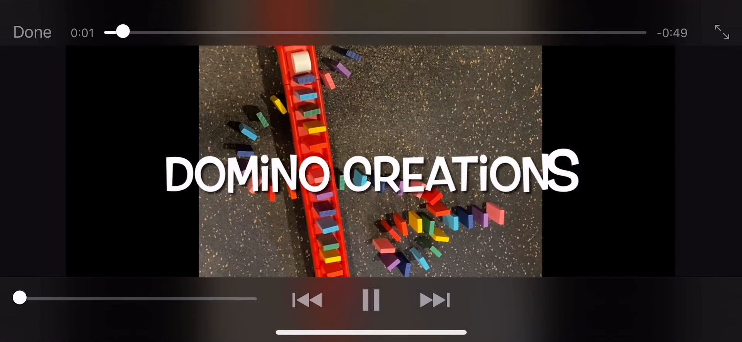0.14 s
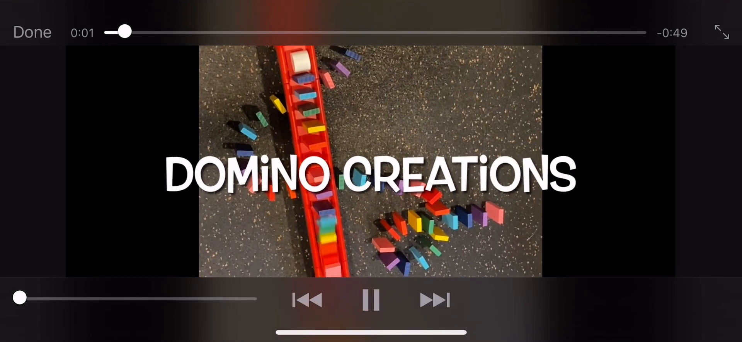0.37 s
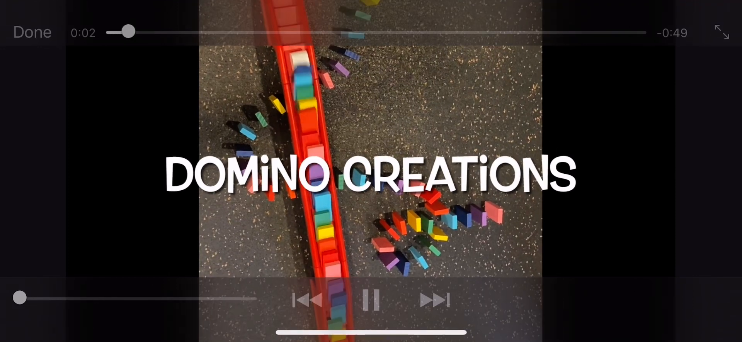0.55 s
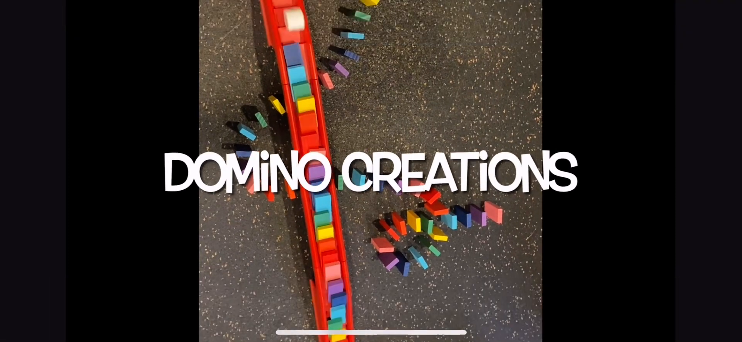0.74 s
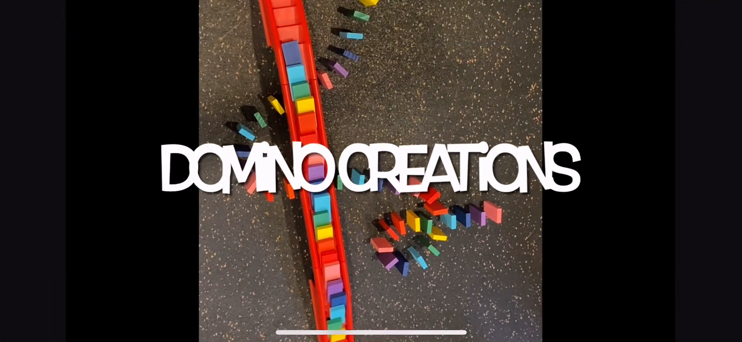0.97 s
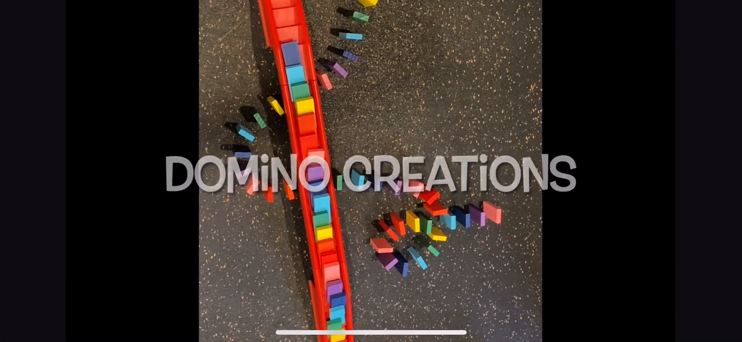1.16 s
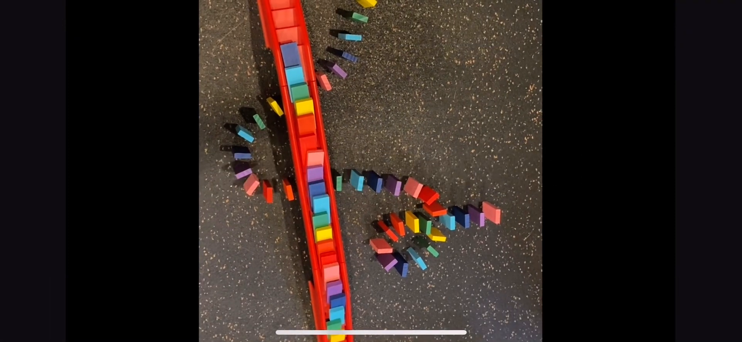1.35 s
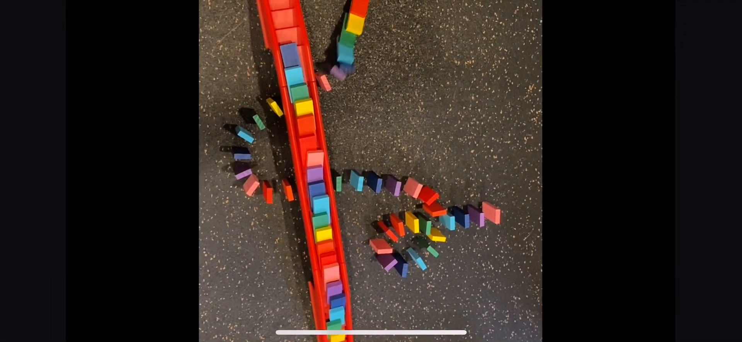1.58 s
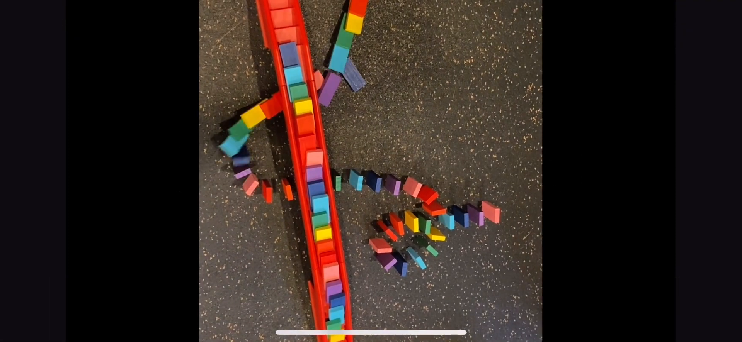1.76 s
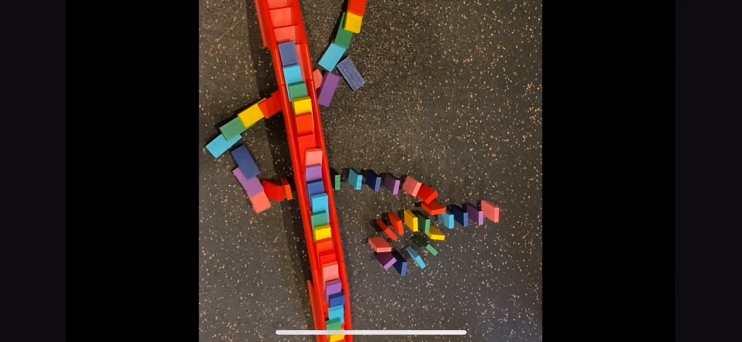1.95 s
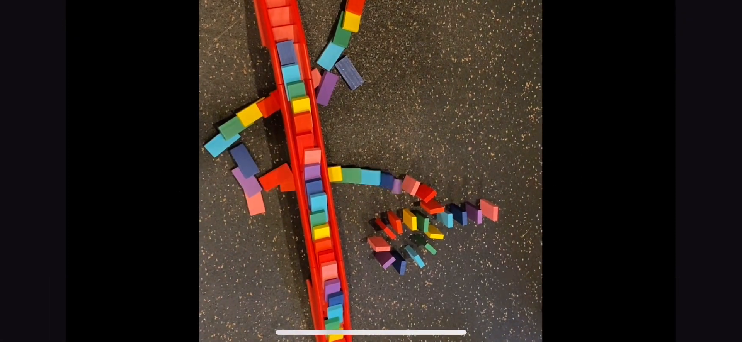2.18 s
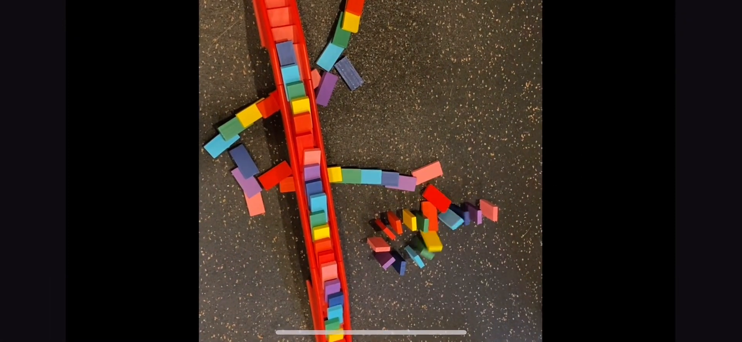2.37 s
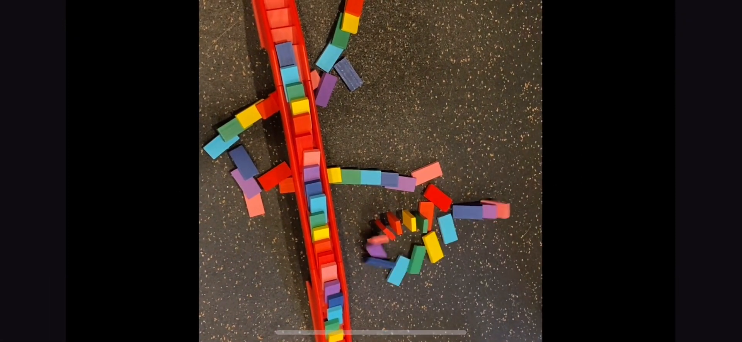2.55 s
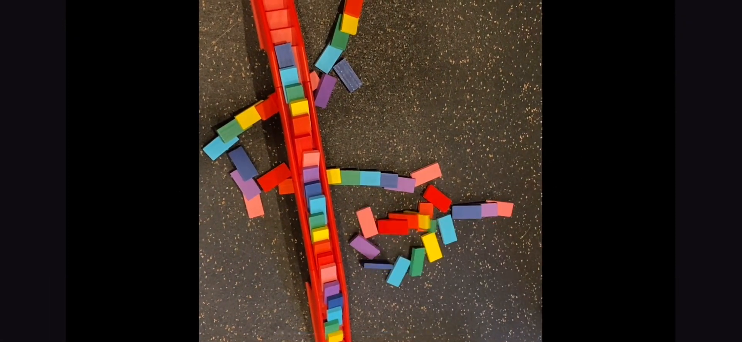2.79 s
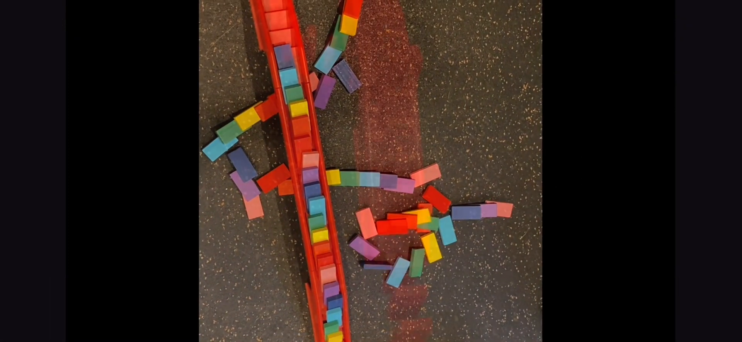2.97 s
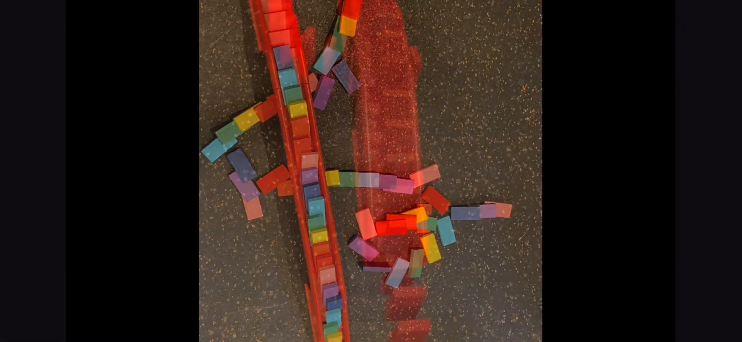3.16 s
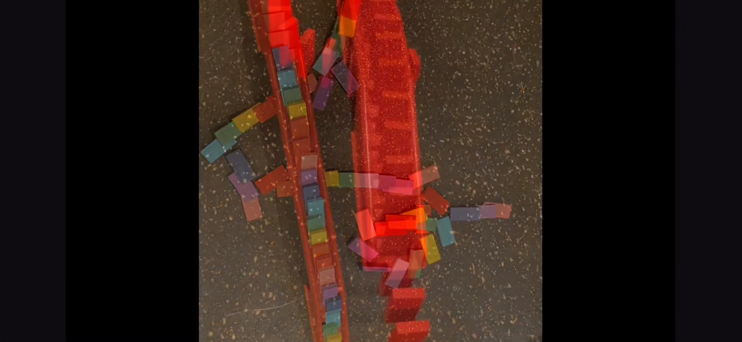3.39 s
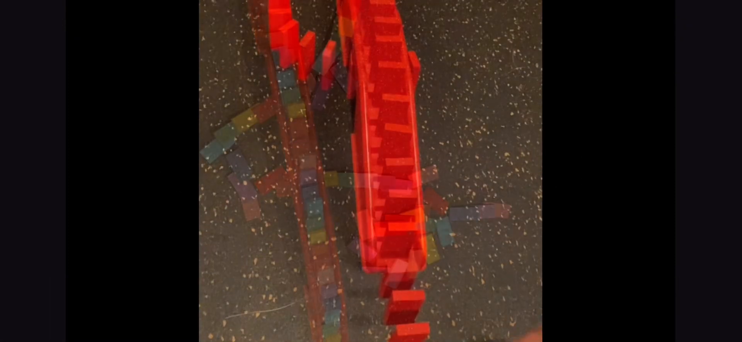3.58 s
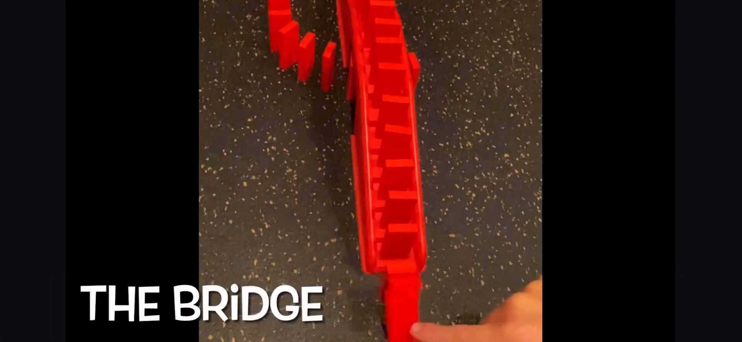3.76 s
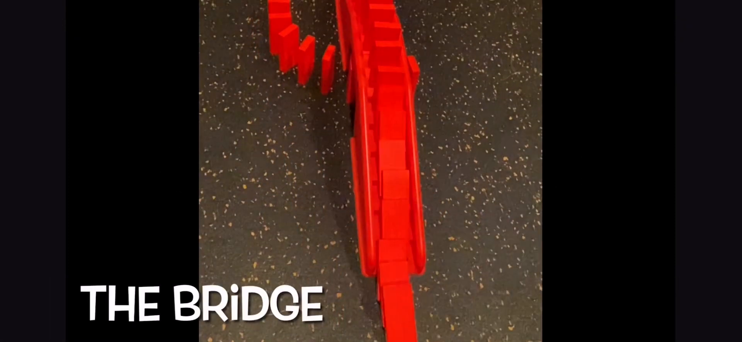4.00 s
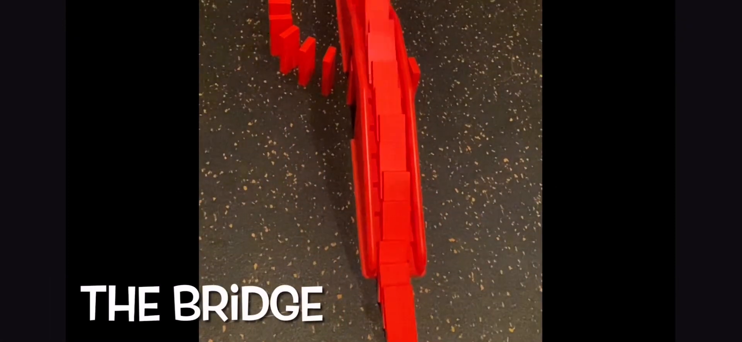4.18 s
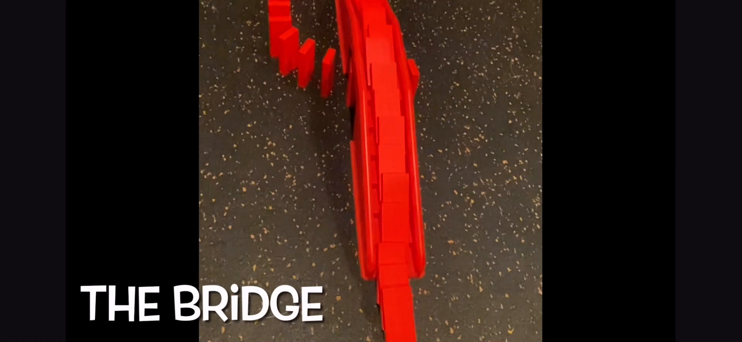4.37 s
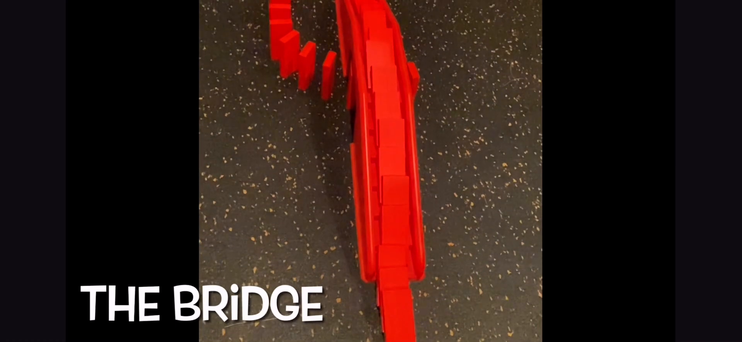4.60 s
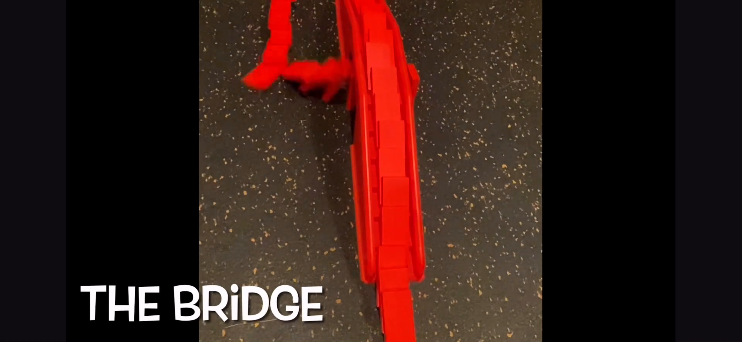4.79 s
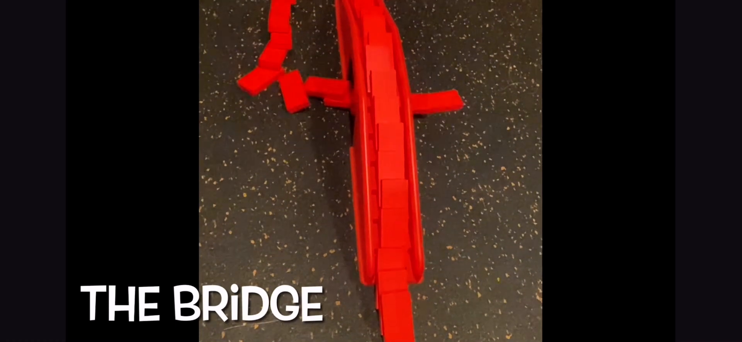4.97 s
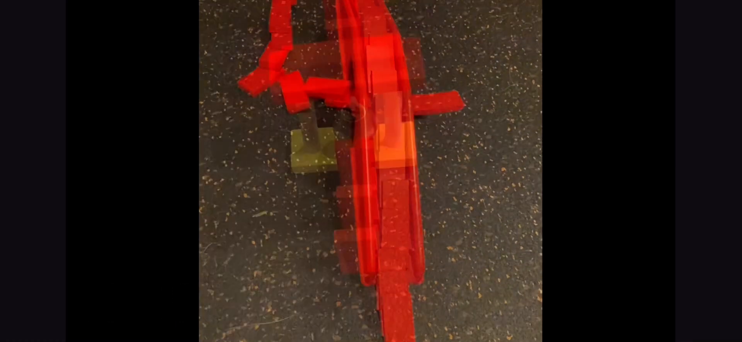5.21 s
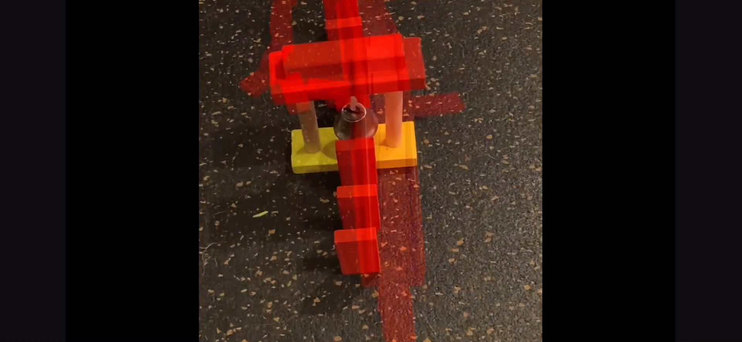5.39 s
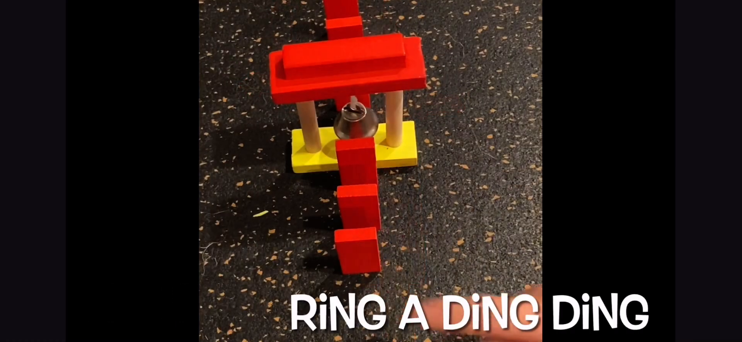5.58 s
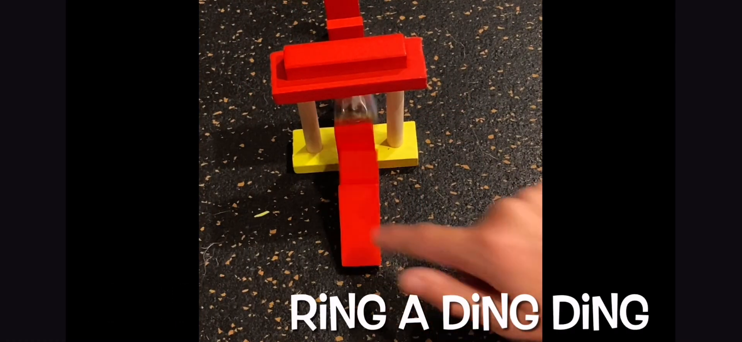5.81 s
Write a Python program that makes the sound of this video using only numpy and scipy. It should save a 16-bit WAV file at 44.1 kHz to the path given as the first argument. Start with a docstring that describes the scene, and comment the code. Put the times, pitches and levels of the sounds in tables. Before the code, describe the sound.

Small wooden dominoes topple close to a phone in a hard room with a short echo and faint low hum. From 0 s a dense, hollow, ringing rattle runs along a bridge, loudest and most crowded around 0.3-0.6 s, then spacing into hard clacks roughly 0.07 s apart until 1.1 s. From 1.2 to 2.9 s lighter ticks and dull taps patter irregularly over a rubber floor, with a few stronger knocks, thinning at the end; the low background wavers as the phone cuts the bass. A soft, deep thump lands at 2.9 s, then mostly hum. Two small ticks at 3.75 s lead into a second bridge run, 3.8-4.35 s, sharp knocks quickening into a bright, tight rattle. Dry floor clicks and taps follow from 4.4 to 5.0 s. Quiet room hum remains, until several small, crisp ticks start another chain at 5.75-5.84 s.

```python
"""A hard room: small wooden dominoes topple near a phone, along a hollow bridge of blocks and over a rubber floor.
On the bridge they clatter densely and ring; on the floor each fall is a tick and a dull tap.
Each blow is a burst of noisy contacts that cracks and rings decaying modes; random taps make the echoes.
Shaped noise is the room hum, two low modes are a thump; the phone's bass cut slides up and down."""
import sys
import numpy as np
from scipy import signal
from scipy.fft import rfft, irfft, next_fast_len
from scipy.io import wavfile
from scipy.ndimage import uniform_filter1d

SR = 44100
rng = np.random.default_rng(int(sys.argv[2]) if len(sys.argv) > 2 else 0)


def wrap_up_sound(samples):
    """Save the sound to the file named by the first command line argument, as 16-bit audio."""
    columns = np.atleast_2d(samples).T
    # keep every value between -1 and 1, then stretch to whole-number steps
    tamed = np.clip(columns, -1, 1)
    steps = np.round(tamed * 32767).astype(np.int16)
    wavfile.write(sys.argv[1], SR, steps)


N = 257544

# room hum spectrum, relative: hz, density_db
HUM_SPECTRUM = [(21, -37.5), (35, -7), (120, -3.5), (419, -22.5), (487, -23), (1430, -24), (2960, -37),
                (7480, -39), (14000, -51.5)]
# bumps in the hum spectrum: hz, width_hz, height_db
HUM_PEAKS = [(410, 35, 12.5), (929, 35, 12.5), (1500, 55, 8)]
# hum level over time: time_s, rms_db
HUM_LEVEL = [(0, -53), (3.3, -57.5), (3.65, -52.5), (5.15, -52.5), (5.45, -59.5), (5.84, -55)]
# left-right likeness of the hum: hz, correlation [0..1]
HUM_LIKENESS = [(60, .96), (200, .92), (900, .6), (6000, .3)]
# floor modes of the thump: hz, level_db
THUMP_MODES = [(52, 4.5), (85, 2.5)]
# room decay: hz, t60_s
ROOM_DECAY = [(400, 0.41), (1000, 0.16), (3000, 0.25), (8000, 0.19), (14000, 0.22)]
# microphone ports, a list for the phone held as usual and one for turned aside: hz, left_lead_rad
PORT_LEAD = [
    [(300, 0), (3400, .8), (6200, -.2), (7600, .1), (8600, 2), (11000, 0), (13100, -3.1), (15800, -5.9)],
    [(150, 0), (690, 1.1), (1380, .8), (1640, .2), (2500, 2), (4140, 5.8), (4900, 7.4), (5800, 5.5),
     (7000, 6.3), (7900, 3.5), (10300, .2), (11700, -.2), (12500, -2.7), (14300, -3.7), (15200, -6.4)],
]
# same two lists: hz, left_minus_right_db
PORT_BALANCE = [
    [(200, -1), (700, 0.87), (2000, 0.11), (8000, 0.67)],
    [(60, -5.5), (99, -3), (160, -13), (270, -19.5), (450, -2.5), (740, 6), (1220, 0), (2010, -4),
     (3330, -4), (5500, 8.5), (9080, 0), (15000, 1)],
]
# phone turned aside: from_s, to_s
TURNED_S = (3.3, 5.3)
# the knock band, then the tick bands: low_hz, high_hz, crack_over_ring_db
BANDS = [(500, 1400, -9), (1400, 2200, -3), (2200, 3000, -1), (3000, 4700, -8), (4700, 6600, 0),
         (6600, 9200, 0), (9200, 17000, 6)]
# floor tile modes: hz, level_db, t60_s
TILE_MODES = [(560, -8, .007), (700, -2, .008), (900, 0, .008), (1250, -3, .007), (1750, 0, .006),
              (2450, -2, .006), (3300, 0, .007), (4300, -3, .006), (5400, -3, .006), (7600, 0, .012),
              (11200, -4, .008)]
# bridge modes: hz, first_build_db, second_build_db, t60_s
BRIDGE_MODES = [(850, -3, -1, .01), (1050, 0, -4, .011), (1570, -7, -2, .028), (1780, -6, -5, .012),
                (1960, -4, -2, .036), (2370, -3, -6, .012), (2720, -6, -6, .01), (3550, -2, -7, .011),
                (3950, 0, -1, .012), (4300, 0, 0, .012), (5000, -7, -5, .01), (5800, -4, -5, .01),
                (7730, -3, -3, .01), (11000, -4, -4, .008)]
# radiation of a floor tile: level_db per band
TILE_BANDS_DB = [-2.87, -3.3, -5.5, 2.5, 1.4, 5, 1.6]
# radiation of the bridge, a row per build: level_db per band
BRIDGE_BANDS_DB = [
    [0.62, -1.2, -4.5, 1, -0.32, 2.6, 3.5],
    [0.03, 0, -3.5, 0.48, -0.8, 8.3, 4],
]
# blur of small contacts on the floor, a list per run: time_s, knock_db, tick_db, colour_octaves over 1 kHz
FLOOR_CLATTER = [
    [(1.15, -45, -61, 2.4), (1.33, -52, -54.5, 2.63), (1.47, -44.5, -47.5, 2.46),
     (1.66, -53.5, -47.5, 3.04), (1.78, -48, -57, 3.2), (2.0, -61, -71, 2.3), (2.3, -49.5, -50.5, 2.4),
     (2.45, -49, -56, 2.5), (2.6, -69, -61, 2.3), (2.78, -56, -60.5, 2.9), (2.97, -61, -67, 1.85),
     (3.03, -76, -91.5, 2.2)],
    [(4.4, -62, -35.5, 0.95), (4.58, -60, -44.5, 1.2), (4.72, -47, -48.5, 2.5), (4.79, -63, -40.5, 2.93),
     (4.9, -41.5, -53, 1.5), (5.0, -56, -78.5, 3), (5.06, -92, -73, 2.2)],
]
# the same on the bridge, a list per build
BRIDGE_CLATTER = [
    [(0, -43, -46, 2.6), (.1, -40, -36.5, 1.07), (.25, -45.5, -33, 1.63), (.32, -40.5, -32.5, 1.63),
     (.41, -47.5, -24, 1.9), (.5, -48.5, -23, 2.01), (.59, -36, -31.5, 1.8), (.64, -58.5, -44, 1.7),
     (.7, -62.5, -43.5, 1.16), (1.15, -62.5, -62, 2.8)],
    [(3.806, -63.5, -41.5, 0.85), (3.85, -33, -38.5, 0.47), (3.94, -39, -29.5, 1), (4.0, -37.5, -33, 1.17),
     (4.1, -58, -30.5, 1.42), (4.26, -45.5, -28, 1.7), (4.36, -56.5, -19.5, 1.77), (4.39, -62, -39, 1.53),
     (4.5, -66, -44.5, 1.6)],
]
# falls on the floor: time_s, knock_db, tick_db, colour_octaves over 1 kHz
FLOOR_FALLS = [(1.168, -55, -38.5, 0.42), (1.1962, -51, -37.5, 2.44), (1.2241, -54, -36, 3.5),
               (1.2336, -27.5, -33, 2.32), (1.26, -32, -54, 1.6), (1.352, -40, -32, 2.58),
               (1.3769, -39, -32.5, 2.54), (1.4136, -38, -33, 2.66), (1.4424, -34, -41, 4.1),
               (1.4679, -30, -28, 3.2), (1.4962, -53, -30, 2.93), (1.5214, -59, -35.5, 2.63),
               (1.5929, -38, -32, 2.9), (1.622, -29, -31, 2.6), (1.6497, -33, -32, 2.8),
               (1.6742, -29.5, -34.5, 1.7), (1.6823, -29, -39, 2.8), (1.706, -30.5, -40.5, 2.2),
               (1.7307, -38, -45, 1.6), (1.7731, -62, -36.5, 2.3), (1.7845, -22, -29.5, 2.3),
               (1.8866, -34, -55, 1.9), (1.922, -53, -41, 2.05), (1.9273, -46, -38.5, 2.64),
               (1.939, -23, -36, 1.14), (1.9895, -41, -38.5, 1.9), (1.999, -41, -38, 2),
               (2.0243, -42, -43, 2.9), (2.0289, -50, -39.5, 2.13), (2.0399, -35.5, -40.5, 2.5),
               (2.0738, -37, -44, 2.1), (2.1069, -36, -42, 2.45), (2.1141, -64, -46, 2.3),
               (2.1399, -42, -40.5, 1.7), (2.147, -40, -41, 3), (2.1725, -32.5, -39, 1.17),
               (2.178, -42, -34.5, 2.3), (2.1976, -42, -34.5, 3.16), (2.215, -43, -46, 1.9),
               (2.2475, -64, -34.5, 2.84), (2.271, -33, -58, 3.4), (2.2905, -45, -40, 1.1),
               (2.3025, -39, -40, 1.25), (2.3117, -30.5, -64, 1.1), (2.35, -61, -50, 1.2),
               (2.3791, -52, -36, 2.7), (2.4449, -38, -65, 3.4), (2.4715, -28.5, -43, 2.5),
               (2.4856, -31, -42.5, 3), (2.5097, -32.5, -29.5, 0.46), (2.5505, -28, -66, 1.7),
               (2.5831, -31, -40.5, 2.45), (2.5922, -38, -29.5, 0.87), (2.6027, -48, -35, 3.05),
               (2.6192, -25.5, -43, 1.2), (2.651, -33, -53, 0.91), (2.6565, -32, -55, 3.4),
               (2.69, -60, -52, 3.1), (2.7055, -68, -45.5, 2.43), (2.764, -47, -42.5, 2.4),
               (2.769, -57, -56, 1.7), (2.7767, -38, -22.5, 4.6), (2.7795, -49, -36, 2.87),
               (2.812, -45.5, -45, 2.8), (2.8945, -58, -43.5, 2.9), (3.7404, -65, -28, 3.4),
               (3.7697, -62, -31, 2.4), (4.4424, -28.5, -39, 2), (4.4886, -59, -34, 1.3),
               (4.5062, -59, -31, 3.1), (4.5346, -34, -33, 2.4), (4.5488, -33.5, -61, 3.9),
               (4.571, -42, -38, 2.1), (4.578, -51, -42, 0.7), (4.6083, -67, -27.5, 2.26),
               (4.636, -51, -33.5, 2.4), (4.6395, -37.5, -43, 2.9), (4.6631, -61, -26.5, 2.8),
               (4.6695, -37, -36, 2.9), (4.6905, -55, -43, 2.5), (4.7362, -56, -30, 3.07),
               (4.7551, -55, -27, 3.3), (4.7717, -26, -60, 0.46), (4.7844, -30, -59, 0.5),
               (4.815, -35, -30, 4.4), (4.8375, -56, -33.5, 2.5), (4.844, -59, -31, 3.43),
               (4.908, -23, -41, 1.3), (4.9112, -33, -28.5, 2.48), (4.9967, -28.5, -63.5, 0.51),
               (5.719, -67, -76.5, 2.54), (5.7522, -51, -27.5, 2.82), (5.785, -70, -63, 2.8),
               (5.8019, -45, -32, 2.77), (5.8053, -44, -30.5, 2.76), (5.833, -62, -34.5, 2.7),
               (5.839, -66, -37, 2.7)]
# blows on the bridge: time_s, knock_db, tick_db, colour_octaves over 1 kHz
BRIDGE_BLOWS = [(0.017, -50, -32, 0.45), (0.0478, -31.5, -27.5, 2.47), (0.0921, -35, -28, 2.48),
                (0.12, -28.5, -25.5, 1.16), (0.146, -35, -27.5, 1.76), (0.1562, -34.5, -29, 1.6),
                (0.1862, -44, -31, 2.3), (0.203, -47, -32.5, 1), (0.255, -46, -35, 0.86),
                (0.2748, -41.5, -29.5, 0.38), (0.2825, -61, -26, 2.16), (0.2869, -43.5, -26, 1.88),
                (0.3318, -33, -25, 2.23), (0.3511, -46, -18.5, 2.1), (0.3772, -34.5, -30, 4.1),
                (0.398, -62.5, -22.5, 4.3), (0.405, -33, -26.5, 1.9), (0.4272, -27, -25, 2.1),
                (0.4576, -35, -23.5, 2.4), (0.481, -30.5, -39, 4), (0.5227, -33, -25, 1.6),
                (0.5497, -30.5, -36.5, 1), (0.564, -37, -21, 2), (0.589, -33.5, -24, 1.94),
                (0.637, -40.5, -34, 1.6), (0.6538, -27.5, -15, 2.3), (0.6571, -25, -19, 2.29),
                (0.733, -21.5, -19.5, 1.98), (0.7364, -28, -24.5, 1.5), (0.804, -17, -17.5, 1.53),
                (0.884, -21.5, -15, 1.82), (0.952, -15.5, -28.5, 2), (0.9602, -30.5, -27, 1.77),
                (1.023, -18, -20, 1.6), (1.0298, -34, -17.5, 1.74), (1.045, -29.5, -26, 1.5),
                (1.056, -26, -31, 1.25), (1.085, -52, -43, 0.42), (3.806, -39, -29.5, 1.7),
                (3.819, -36, -24.5, 2.87), (3.8388, -26.5, -22, 1.14), (3.859, -29, -24, 1.55),
                (3.884, -25, -18, 1.54), (3.9152, -23.5, -20, 1.26), (3.94, -44.5, -30.5, 2.5),
                (4.0052, -23.5, -24.5, 2.37), (4.038, -49.5, -27, 1.15), (4.0636, -39.5, -18.5, 2.57),
                (4.0958, -32, -22.5, 1.3), (4.1319, -54, -17.5, 1.56), (4.1515, -37, -14, 2.2),
                (4.162, -47.5, -22, 2), (4.184, -48.5, -15, 1.48), (4.208, -46, -21.5, 1.5),
                (4.2164, -32.5, -14.5, 1.82), (4.238, -51.5, -19, 2.15), (4.246, -46, -19, 1.7),
                (4.2645, -38, -12, 2.24), (4.278, -28, -27, 0.67), (4.292, -32.5, -22.5, 2.5),
                (4.3109, -42, -16, 2.13), (4.321, -43.5, -24.5, 1.5), (4.3357, -27.5, -21.5, 1.8),
                (4.346, -51, -32.5, 1.7), (4.3527, -44.5, -24.5, 2.04)]
# several tiles land together: from_s, to_s
RUSHES = [(.3, .39), (.4, .54), (4.17, 4.21), (4.25, 4.37)]
# microphone response: hz, level_db
MIC_RESPONSE = [(25, -19), (50, -5.5), (600, -3), (1000, -4.5), (1400, -5.5), (2000, -1.5), (2900, -3.5),
                (4100, -7.5), (5800, -11), (7600, -10.5), (8500, -11.5), (11000, -8.5), (13300, -10),
                (15000, -12.5), (16500, -36)]
# sliding bass cut: time_s, corner_hz
BASS_CUT = [(.36, 150), (.45, 177), (.62, 220), (.78, 450), (1.25, 410), (1.4, 477), (1.65, 526),
            (1.78, 423), (2.1, 410), (2.42, 162), (2.6, 317), (2.86, 388)]
# lowest bass breaks through the cut, then sinks again: time_s, lift_db
BASS_LIFTS = [(1.08, 17), (1.17, 15.5), (1.65, 20), (2.17, 30)]

THUMP_S, THUMP_RMS_DB = 2.926, -30  # at its peak
THUMP_RISE_DB_PER_S, THUMP_FALL_DB_PER_S = 520, 190
ECHO_DB, ECHO_TILT_DB_PER_OCTAVE = -10.5, 1
ECHO_TURN_S = 0.4  # echo patterns trade places, so that no single one colours the tail
STRIKE_SAMPLES = 2600
FRAME_T60_S = .022  # modes at least this long belong to the frame and keep their pitch
SNAP_DB = 5.5  # hardest touch over the scrape around it
RUSH_SPREAD = 2.2  # rushed blows build and fade this many times slower
KNOCK_DB_PER_OCTAVE = -22
NARROW_DB_PER_OCTAVE2, SKIRT_DB = 11, -15.5  # tick loss per squared octave off its colour, onto a skirt
CUT_SPLIT_HZ, CUT_DB, CUT_LOW_DB = 130, 18, 23  # depth over and under the split
SINK_DB_PER_S = 60
EDGE_HZ = 16750


def gain_of(db):
    """Decibels to an amplitude factor."""
    return 10 ** (np.asarray(db) / 20)


def evened(x):
    """Scale to rms 1."""
    return x / np.sqrt(np.mean(x ** 2) + 1e-20)


def read_spectrum(points, hz):
    """Interpolate a spectrum table on a log frequency axis."""
    point_hz, value = np.transpose(points)
    return np.interp(np.log(hz + 1), np.log(point_hz + 1), value)


def controls(rows):
    """Table columns interpolated over time, and a mask of where the table applies."""
    time_s, *columns = np.transpose(rows)
    t = np.arange(N) / SR
    return [np.interp(t, time_s, c) for c in columns], (t >= time_s[0]) & (t <= time_s[-1])


def hum():
    """Room noise shaped in frequency, with drifting patches and partly alike sides."""
    frames, hz = N // 256 + 5, np.fft.rfftfreq(1024, 1 / SR)
    a, b, c, d, patches = rng.standard_normal((frames, 513, 5)).T
    patches = uniform_filter1d(patches, 10, 0)
    patches = evened(uniform_filter1d(patches, 14, 1))
    same = np.clip(read_spectrum(HUM_LIKENESS, hz), -1, 1)[:, None]
    left = a + 1j * b
    right = same * left + np.sqrt(1 - same ** 2) * (c + 1j * d)
    peaks_db = sum(db / (1 + (2 * (hz - f) / width_hz) ** 2) for f, width_hz, db in HUM_PEAKS)
    shape_db = (read_spectrum(HUM_SPECTRUM, hz) + peaks_db)[:, None]
    z = np.array([left, right]) * gain_of(shape_db + 1.5 * patches)
    noise = signal.istft(z, nperseg=1024, noverlap=768)[1][:, :N]
    return gain_of(controls(HUM_LEVEL)[0][0]) * evened(noise)


def thump():
    """A soft footfall shakes two low modes of the floor."""
    t = np.arange(N) / SR - THUMP_S
    slope_db_per_s = np.where(t < 0, THUMP_RISE_DB_PER_S, -THUMP_FALL_DB_PER_S)
    modes = sum(gain_of(db) * np.cos(2 * np.pi * hz * t) for hz, db in THUMP_MODES)
    return gain_of(THUMP_RMS_DB + slope_db_per_s * t) * evened(modes)


def room(x):
    """Sparse random-sign echoes, decaying per frequency; three patterns crossfade steadily for a smooth tail."""
    taps = np.zeros((3, 2, SR // 2))
    at = np.arange(260, SR // 2 - 20, 20)
    at = at + rng.integers(0, 20, (3, 2, len(at)))
    np.put_along_axis(taps, at, rng.choice([-1., 1.], at.shape), 2)
    taps[:, 1] = 0.81 * taps[:, 0] + 0.68 * taps[:, 1]  # sides partly alike
    hz, t, z = signal.stft(taps, SR, nperseg=256)
    tilt_db = ECHO_TILT_DB_PER_OCTAVE * np.log2(hz[:, None] + 200)
    decay_db = 60 * t / read_spectrum(ROOM_DECAY, hz)[:, None]
    tails = signal.istft(z * gain_of(tilt_db - decay_db), SR, nperseg=256)[1]
    turn = np.pi * np.arange(N) / SR / ECHO_TURN_S
    out = np.zeros((2, N))
    for k, tail in enumerate(tails):
        fed = x * np.sqrt(2 / 3) * np.cos(turn + k * np.pi / 3)
        out += signal.fftconvolve(fed, tail / np.linalg.norm(tail[0]), axes=1)[:, :N]
    return out


def ports(x):
    """Near sound reaches the two ports with a lead and balance that depend on how the phone is held."""
    size = next_fast_len(N)
    hz, t = np.fft.rfftfreq(size, 1 / SR), np.arange(N) / SR
    side = np.array([[.5], [-.5]])
    spectrum = rfft(x, size)
    holds = []
    for lead, balance in zip(PORT_LEAD, PORT_BALANCE):
        phase = np.exp(1j * side * read_spectrum(lead, hz))
        gain = gain_of(side * read_spectrum(balance, hz))
        holds.append(irfft(spectrum * phase * gain, size)[:, :N])
    usual, turned = holds
    return np.where((t > TURNED_S[0]) & (t < TURNED_S[1]), turned, usual)


def band_gains(knock_db, tick_db, colour_octaves):
    """A dull knock fills the lowest band; a tick fills the others with a hump around its colour."""
    middle = np.log2([lo_hz * hi_hz for lo_hz, hi_hz, _ in BANDS])[:, None] / 2
    octave = middle - middle[0]
    off_colour = octave - .25 - np.clip(colour_octaves, .5, 3.6)
    hump = (octave > 0) * (gain_of(-NARROW_DB_PER_OCTAVE2 * off_colour ** 2) + gain_of(SKIRT_DB))
    knock = gain_of(knock_db + KNOCK_DB_PER_OCTAVE * octave)
    return np.hypot(knock, gain_of(tick_db) * hump)


def cracks(low_hz):
    """One sharp click, band-passed into each band."""
    click = np.arange(STRIKE_SAMPLES) == 0
    out = []
    for lo_hz, hi_hz, _ in BANDS:
        band = signal.butter(3, [max(lo_hz, low_hz), hi_hz], "band", fs=SR, output="sos")
        out.append(evened(signal.sosfilt(band, click)))
    return out


def strike(modes, contact_s, rise_s, crack_db, spread_db, detune, settle_db, clicks, bands_db, low_hz):
    """One blow per band and port: a scrape of contacts cracks and rings modes that differ from tile to tile."""
    t = np.arange(STRIKE_SAMPLES) / SR
    hz, db, t60_s = np.transpose(modes)
    level_chance, pitch_chance, sign_chance = rng.standard_normal((3, len(hz)))
    tile_hz = hz * (1 + detune * pitch_chance * (t60_s < FRAME_T60_S))
    decay = gain_of(db + spread_db * level_chance - 60 * t[:, None] / t60_s)
    ring = decay * np.sign(sign_chance) * np.sin(2 * np.pi * tile_hz * t[:, None])
    settling = gain_of(settle_db) * np.exp(-t / 0.013)  # the tile rocks and slides to rest
    force = (np.exp(-t / contact_s) + settling) * (1 - np.exp(-(t / rise_s) ** 2))
    shared, left, right = rng.standard_normal((3, len(t)))
    scrape = (shared + 0.55 * np.array([left, right])) * force
    contact = scrape + gain_of(SNAP_DB) * (np.arange(len(t)) == round(.8 * rise_s * SR))
    attack = SR // 200 + round(rise_s * SR)
    parts = []
    for (lo_hz, hi_hz, band_db), click in zip(BANDS, clicks):
        body = ring[:, (hz >= lo_hz) & (hz < hi_hz)].sum(1)
        response = evened(body) + gain_of(crack_db + band_db) * click
        part = signal.fftconvolve(response[None], contact, axes=1)[:, :len(t)]
        parts.append(part / np.std(part[:, :attack]))  # unit level over the attack
    parts = gain_of(bands_db)[:, None, None] * parts
    no_bass = signal.butter(2, 0.96 * low_hz, "high", fs=SR, output="sos")  # small tiles radiate no bass
    return signal.sosfilt(no_bass, parts)


def clatter(tables, modes, per_s, size_db, **how):
    """Many small contacts at random moments, a few of them large, drawn from 16 strikes."""
    sounds = np.array([strike(modes, **how) for _ in range(16)])
    energy = (sounds ** 2).sum(3).mean((0, 2))
    sounds = sounds * (gain_of(how["bands_db"]) / np.sqrt(energy))[:, None, None]
    size = gain_of(size_db * np.minimum(rng.exponential(1, N), 4)) * (rng.random(N) < per_s / SR)
    size = size / np.sqrt(uniform_filter1d(size ** 2, 4000) + 1e-9)  # even density
    kind, out = rng.integers(0, 16, N), np.zeros((2, N))
    for columns, during in map(controls, tables):
        length = during.sum()
        points = next_fast_len(length + sounds.shape[3])
        spectrum = sum(rfft((size * (kind == k))[during], points) * rfft(sound, points)
                       for k, sound in enumerate(sounds))
        bands = irfft(spectrum, points)[..., :length]
        out[:, during] += (band_gains(*columns)[:, None, during] * bands).sum(0)
    return out


def blows(table, modes, contact_s, rise_s, rushes=(), **how):
    """Each listed blow at its moment, its bands weighted into knock and tick."""
    out = np.zeros((2, N + SR))
    time_s, *columns = np.transpose(table)
    for start_s, gains in zip(time_s, band_gains(*columns).T):
        slow = RUSH_SPREAD if any(a < start_s < b for a, b in rushes) else 1
        bands = strike(modes, slow * contact_s, slow * rise_s, **how)
        sound = np.tensordot(gains, bands, 1)
        at = max(round((start_s - .5 * slow * rise_s) * SR), 0)  # contacts build up to the blow
        out[:, at:at + sound.shape[1]] += sound
    return out[:, :N]


def floor_tiles():
    """Tiles on rubber: short contacts and short modes give ticks and dull taps."""
    how = dict(contact_s=.0007, rise_s=.0006, crack_db=3, spread_db=3, detune=.05,
               clicks=cracks(500), bands_db=TILE_BANDS_DB, low_hz=500)
    falls = blows(FLOOR_FALLS, TILE_MODES, settle_db=-22.0, **how)
    return falls + clatter(FLOOR_CLATTER, TILE_MODES, per_s=1200, size_db=7.5, settle_db=-19.5, **how)


def bridge_tiles():
    """Tiles on the hollow bridge: longer contacts ring its modes, balanced anew for each of two builds."""
    how = dict(contact_s=.0015, rise_s=.0014, crack_db=2, spread_db=5, detune=.045,
               clicks=cracks(750), low_hz=750)
    out = np.zeros((2, N))
    for k, run in enumerate(BRIDGE_CLATTER):
        modes = np.delete(BRIDGE_MODES, 2 - k, axis=1)  # drop the other build's levels
        rows = [row for row in BRIDGE_BLOWS if run[0][0] <= row[0] <= run[-1][0]]
        bands_db = BRIDGE_BANDS_DB[k]
        out += blows(rows, modes, rushes=RUSHES, settle_db=-22.5, bands_db=bands_db, **how)
        out += clatter([run], modes, per_s=900, size_db=4.5, settle_db=-41.0, bands_db=bands_db, **how)
    return out


def scene():
    """Dominoes at the ports and in the room, over hum and thump."""
    near = ports(floor_tiles() + bridge_tiles())
    return hum() + thump() + gain_of(ECHO_DB) * room(near) + near


def record(dry):
    """Soft overload, microphone colour, the sliding bass cut, then the band limit."""
    overloaded = np.tanh(dry)
    hz, t, z = signal.stft(overloaded, SR, nperseg=1024, noverlap=768)
    hz_column = hz[:, None]
    time_s, corner_hz = np.transpose(BASS_CUT)
    active = (t > time_s[0]) & (t < time_s[-1])
    under = active / (1 + (hz_column / np.interp(t, time_s, corner_hz)) ** 24)
    lifts_db = [(t > at_s) * np.maximum(db - SINK_DB_PER_S * (t - at_s), 0) for at_s, db in BASS_LIFTS]
    low_db = CUT_LOW_DB - np.max(lifts_db, axis=0)
    cut_db = under * np.where(hz_column < CUT_SPLIT_HZ, low_db, CUT_DB)
    z = z * gain_of(read_spectrum(MIC_RESPONSE, hz)[:, None] - cut_db)
    heard = signal.istft(z, SR, nperseg=1024, noverlap=768)[1][:, :N]
    band_limit = signal.firwin(511, EDGE_HZ, window=("kaiser", 9), fs=SR)
    return signal.oaconvolve(heard, band_limit[None], "same")


dry = scene()
out = record(dry)
wrap_up_sound(out)
```